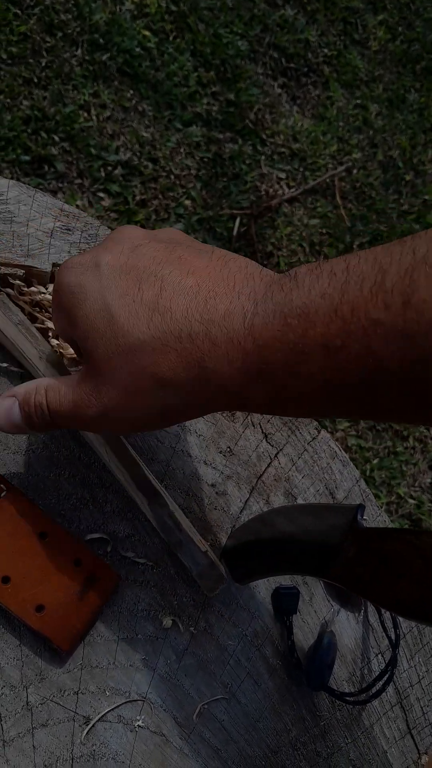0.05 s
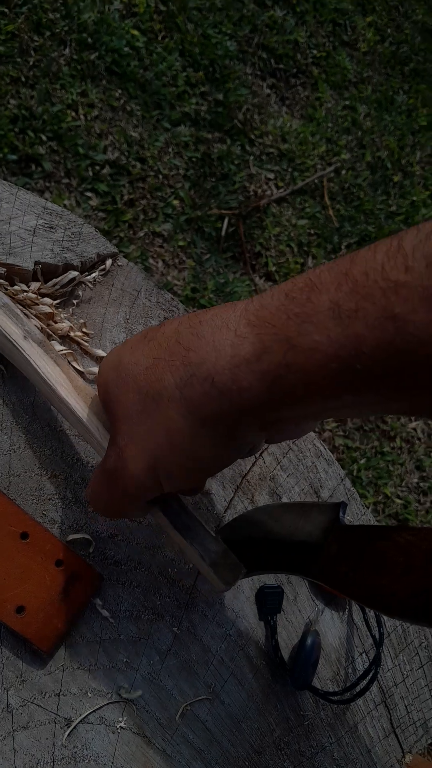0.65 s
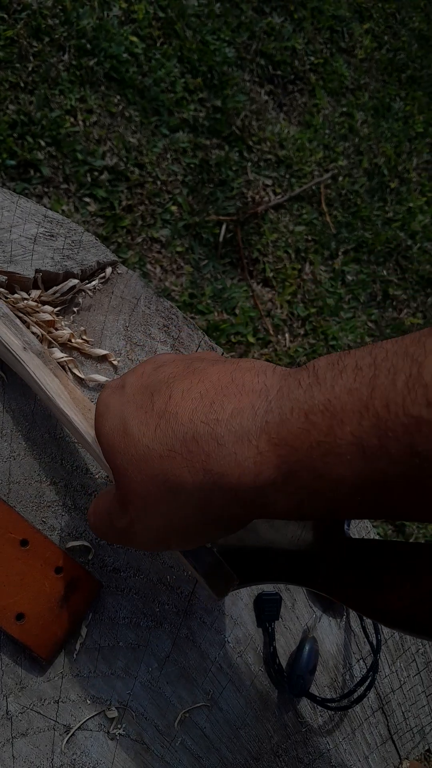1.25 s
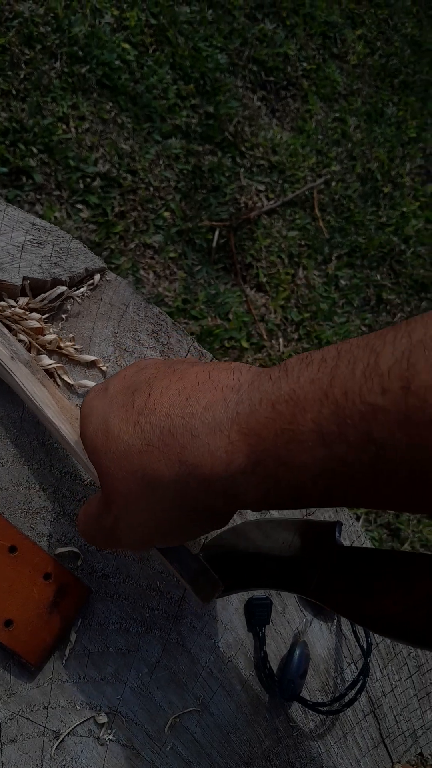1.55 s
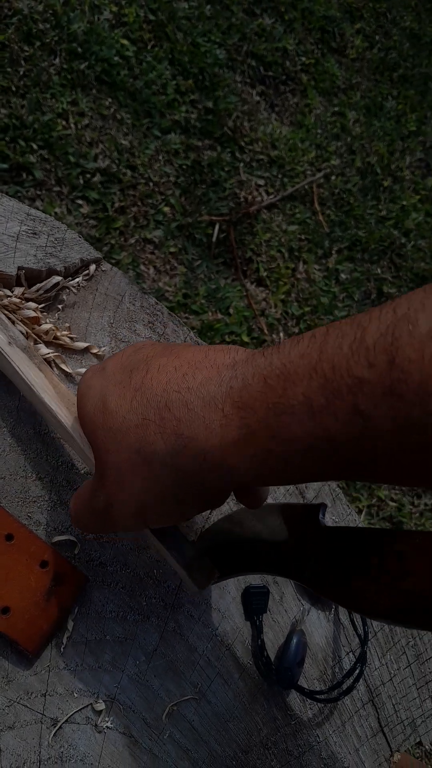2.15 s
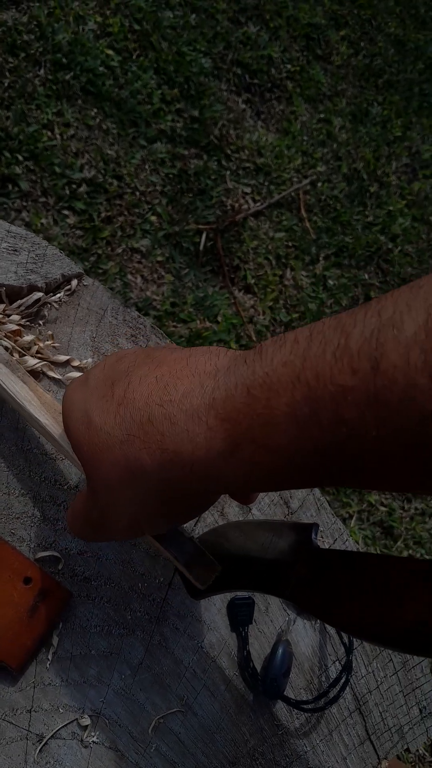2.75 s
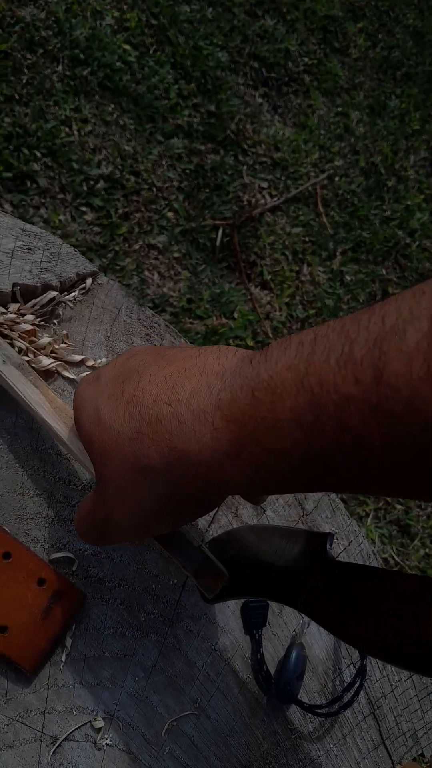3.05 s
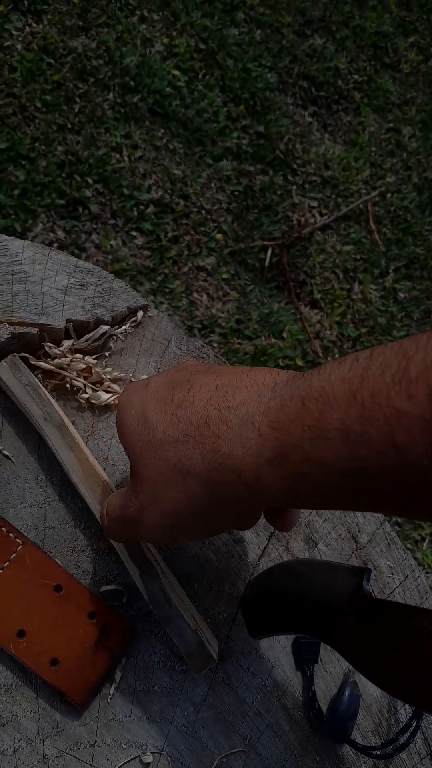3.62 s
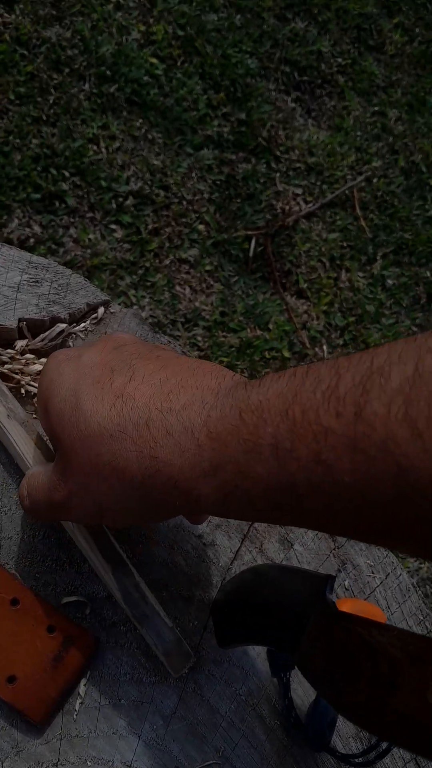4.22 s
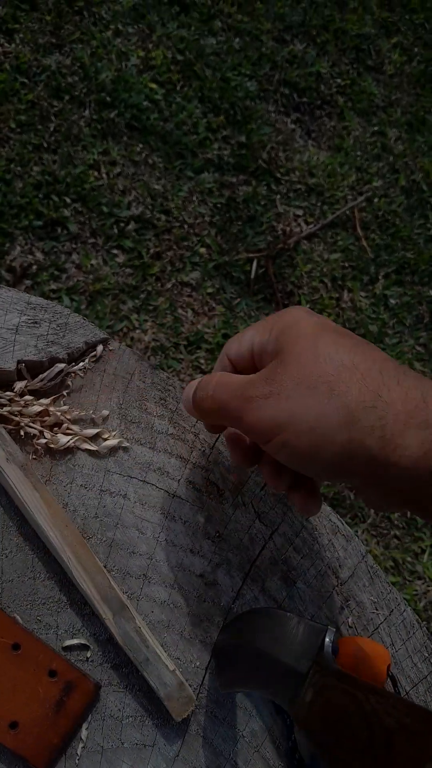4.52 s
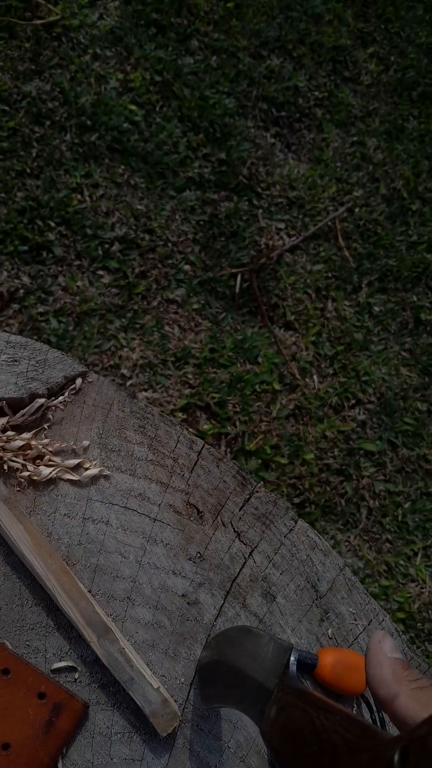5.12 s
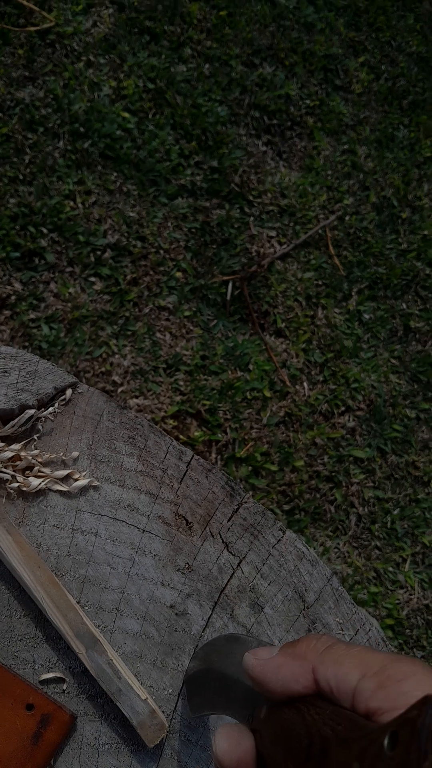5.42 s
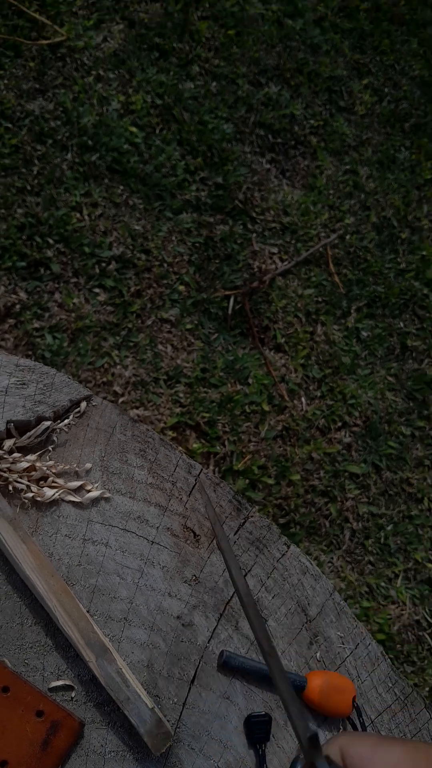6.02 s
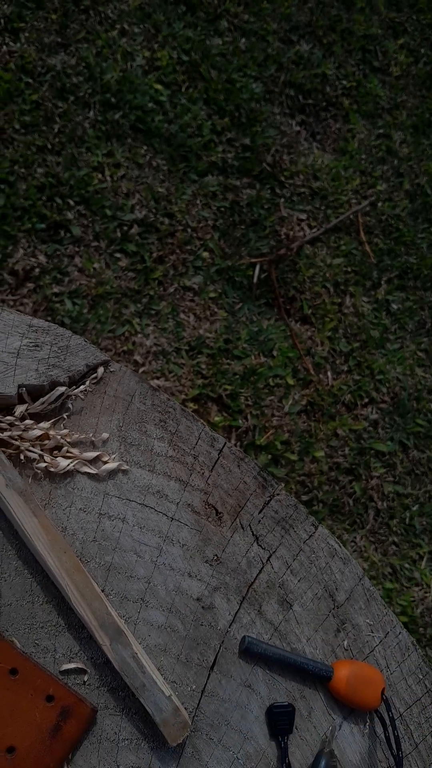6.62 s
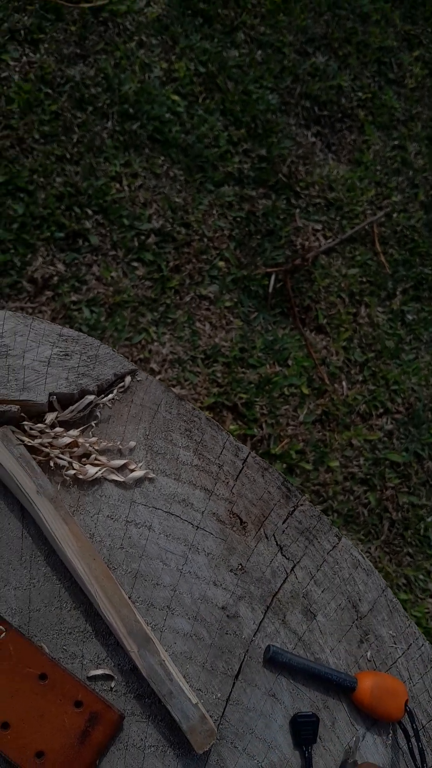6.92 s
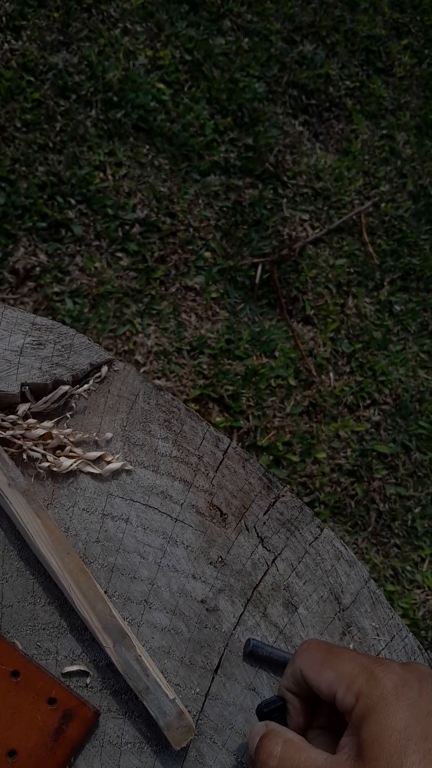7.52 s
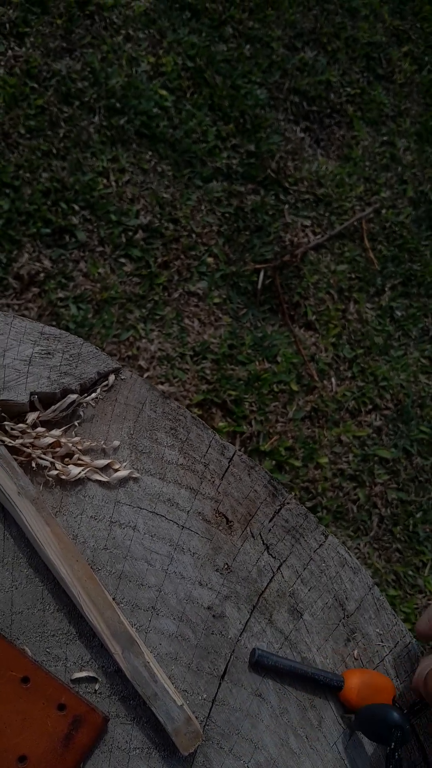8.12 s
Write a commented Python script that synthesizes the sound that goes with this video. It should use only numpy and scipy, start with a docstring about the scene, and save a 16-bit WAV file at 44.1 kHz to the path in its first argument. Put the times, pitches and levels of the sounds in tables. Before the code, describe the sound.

Wind buffets the microphone throughout with a low, uneven rumble, gusting in the first second, thumping near 1.8 seconds and gusting again around 3.5, then easing. Close by, a dry wooden stick is rubbed and shifted on a stump in soft, grainy, slightly squeaky scuffs from about 0.4 to 3.4 seconds. At 3.5 seconds it hits the stump with one sharp, briefly ringing knock, the loudest sound, followed by faint taps. From 4 seconds fingers brush lightly over tools. Near 5.8 seconds a knife is lifted with a small tick and a short, faint scrape. A fire steel is nudged with light ticks and dull wooden bumps between 6.4 and 6.8 seconds, and one more click comes at 8.3. Distant birds whistle and trill faintly and insects buzz over a soft garden hush.

```python
"""A dry wooden stick is rubbed and shifted by hand on a stump, then knocks down once and rings.
Next a knife is taken up and a fire steel is nudged: light brushing, small ticks and dull bumps.
Wind buffets the two microphone openings (ports), each on its own, making a low, lumpy rumble.
Far off, birds and insects call faintly over the hush of a garden."""
import sys
import numpy as np
from scipy import signal
from scipy.fft import rfft, irfft
from scipy.io import wavfile

SR = 44100
rng = np.random.default_rng(int(sys.argv[2]) if len(sys.argv) > 2 else 0)


def transcribe(u):
    """Save the signal u as a 16-bit wav file named by the first command-line argument.

    u: samples, shape (n,) or (channels, n), limited to [-1, 1]; the rate is SR.
    q: integer samples, one column per channel.
    """
    v = np.clip(np.atleast_2d(u).T, -1, 1)
    q = np.round(v * 32767).astype(np.int16)
    wavfile.write(sys.argv[1], SR, q)


N = 368676
TIME = np.arange(N) / SR


def from_db(db):
    """Turn decibels into a gain to multiply by."""
    return 10 ** (np.asarray(db) / 20)


def rms_one(x):
    """Scale a signal so that its average strength (rms) is 1."""
    return x / np.sqrt(np.mean(x ** 2) + 1e-20)


def in_time(rows):
    """Join a table's points with straight lines: one curve for each column after the time."""
    times, *columns = np.transpose(rows)
    return [np.interp(TIME, times, column) for column in columns]


def at_hz(colour, hz):
    """Read the level at hz from a colour: a table of how strong each frequency is."""
    freqs, db = np.transpose(colour)
    return np.interp(np.log(hz), np.log(freqs), db)


def filtered(x, hz, kind, order=2):
    """Keep the "low" part, the "high" part or one "band" of a sound."""
    sections = signal.butter(order, np.clip(hz, 10, .45 * SR), kind, fs=SR, output="sos")
    return signal.sosfilt(sections, x + 1e-18)


def pan(lean_db):
    """Left and right gains; the lean says how much louder the left side is."""
    return rms_one(from_db([[lean_db / 2], [-lean_db / 2]]))


def drift(per_s):
    """A random wobble of typical size 1 that heads for a new value per_s times a second."""
    knots = rng.standard_normal(4000)
    return rms_one(np.interp(TIME * per_s, np.arange(len(knots)), knots))


def noise(colour, alike=0.):
    """Stereo noise that fades steeply past its colour's ends; alike=1 makes both sides the same."""
    hz = np.maximum(np.arange(N // 2 + 1) * SR / N, 1)
    low_fade = np.minimum(hz / colour[0][0], 1) ** 2
    high_fade = np.minimum(colour[-1][0] / hz, 1) ** 4
    gain = from_db(at_hz(colour, hz)) * low_fade * high_fade
    mid, side = irfft(rfft(rng.standard_normal((2, N))) * gain, N)
    return rms_one(np.sqrt(1 + alike) * mid + np.sqrt(1 - alike) * side * [[1], [-1]])


def fade(t60, t):
    """A gain that drops by 60 dB in t60 seconds, the fade time."""
    return from_db(-60 * t / t60)


def ring(hz, t60, t):
    """One dying tone of a struck object."""
    return np.sin(2 * np.pi * hz * t) * fade(t60, t)


def swell(s, hold_s, rise_s, fall_s):
    """A gain that reaches 1 at time s, holds, then dies away; rise and fall each cover 20 dB."""
    return from_db(-20 * np.clip(np.maximum((s - TIME) / rise_s, (TIME - s - hold_s) / fall_s), 0, 10))


def noise_swells(rows, colour, rise_s, fall_s, grain_db, grains_per_s, alike=.2):
    """Swells of noise, roughened by a quick flicker in level."""
    power = sum((from_db(db) * swell(s, hold_s, rise_s, fall_s)) ** 2 for s, hold_s, db in rows)
    grain = from_db(grain_db * drift(grains_per_s))
    return np.sqrt(power) * grain * noise(colour, alike)


def add(out, s, sound):
    """Mix a short sound in at time s."""
    i = max(int(s * SR), 0)
    out[:, i:i + sound.shape[-1]] += sound[..., :N - i]


# How the hush rises and falls: t/s, level/dB (in all tables, levels are before any further gains)
HUSH_LEVELS = [(3.9, -72.5), (4.66, -72), (4.93, -67.5), (5.5, -75), (5.9, -70.5), (6.87, -68.5),
               (7.14, -72.5), (8.36, -67)]
# Colours of the low hush and the high hiss: f/Hz, level/dB
HUSH_COLOUR = [(300, 3), (750, -9), (1030, 1.5), (1250, -5.5), (1550, 3.5), (1950, -12.5), (2300, -2),
               (2700, -11), (3200, -9.5), (4500, -16), (8000, -19)]
HISS_COLOUR = [(2000, 6.5), (4500, -8), (7400, 0.5), (9000, -6.5), (12000, -4.5), (16000, -4.5)]


def garden(hush_gain_db=5.0, waver_db=.8, hiss_db=-73):
    """A distant hush wavers a little over an even hiss."""
    level_db, = in_time(HUSH_LEVELS)
    hush = from_db(level_db + hush_gain_db + waver_db * drift(12)) * noise(HUSH_COLOUR, alike=0.067)
    return hush + from_db(hiss_db) * noise(HISS_COLOUR)


# Swells of a midrange hush: t/s, hold/s, level/dB
MID_SWELLS = [(0.0, 3.73, -63.5), (0.35, 0.65, -63.5), (2.75, 0.89, -63.5), (4.04, 0.029, -64)]
# Their colour: f/Hz, level/dB
MID_COLOUR = [(450, -3.5), (800, -6.5), (1350, 1), (1700, 1), (2000, -4.5), (2800, -9.5), (3300, -11),
              (5000, -21), (9000, -23.5)]


def midrange_hush():
    """A soft, steady midrange hush through the first half, with one brief swell after it."""
    return noise_swells(MID_SWELLS, MID_COLOUR, rise_s=0.14, fall_s=0.11, grain_db=1.93, grains_per_s=60)


# A bird's quick run: start t/s, end t/s, notes per s, start f/Hz and end f/Hz of each note,
# first level/dB, last level/dB
TRILL = (0.40, 1.25, 14, 4450, 3750, -73, -77.5)


def trill_notes(note_s=.06, width_hz=320, vary_db=3.5):
    """List the run as short falling whistles, uneven and tending to grow weaker."""
    start_s, end_s, per_s, start_hz, end_hz, first_db, last_db = TRILL
    times = np.arange(start_s, end_s, 1 / per_s)
    levels = np.linspace(first_db, last_db, len(times)) + vary_db * rng.standard_normal(len(times))
    return [(s, note_s, start_hz, end_hz, db, width_hz) for s, db in zip(times, levels)]


# Falling bird whistles: t/s, length/s, start f/Hz, end f/Hz, level/dB, width of the blur/Hz
WHISTLES = [(0.0, .19, 4170, 3560, -74.5, 220), (0.16, 0.18, 6420, 5010, -73, 80),
            (0.27, 0.095, 5400, 3750, -72.5, 80), (0.755, 0.028, 5500, 3870, -71.5, 100),
            (3.218, .125, 5300, 3950, -65.5, 524), (6.142, .068, 6800, 5550, -79, 250),
            (7.9, 0.33, 4960, 4090, -81, 250), (7.935, .36, 4120, 3600, -77, 110.6)]
# Hoarse bird calls and insect buzzes, each on one pitch: t/s, length/s, f/Hz, level/dB
HOARSE_CALLS = [(2.657, .12, 4250, -72), (2.735, .28, 3090, -70.5), (3.038, .09, 3416, -67),
                (3.318, .45, 3250, -68.5)]
BUZZES = [(2.39, .35, 6630, -75.5), (4.674, .3, 6760, -84.5), (5.72, .15, 9900, -76),
          (6.937, 0.28, 7000, -79.5), (7.02, .19, 9900, -80), (8.006, .17, 9980, -76)]


def birds_and_insects(gain_db=9.5, hoarse_width_hz=280, buzz_width_hz=850, echo_db=-9, echo_t60=0.43):
    """Calls are blurred into narrow bands of noise by distance and by echoes from the trees."""
    hoarse = [(s, length, hz, hz, db, hoarse_width_hz) for s, length, hz, db in HOARSE_CALLS]
    buzzes = [(s, length, hz, hz, db, buzz_width_hz) for s, length, hz, db in BUZZES]
    calls = np.zeros((2, N))
    for s, length, start_hz, end_hz, db, width_hz in WHISTLES + trill_notes() + hoarse + buzzes:
        progress = np.linspace(0, 1, int(length * SR))
        white = rng.standard_normal((2, SR)) + 1j * rng.standard_normal((2, SR))
        blur = filtered(white, width_hz / 2, "low", order=1)
        blur = filtered(blur, 2 * width_hz, "low")[:, -len(progress):]
        tone = np.exp(2j * np.pi * np.cumsum(start_hz + (end_hz - start_hz) * progress) / SR)
        arch = np.sqrt(4 * progress * (1 - progress))
        add(calls, s, from_db(db + gain_db) * arch * rms_one((blur * tone).real))
    t = TIME[:SR // 2]
    trees = rms_one(rng.standard_normal((2, len(t))) * fade(echo_t60, t)) / np.sqrt(len(t))
    return calls + from_db(echo_db) * signal.fftconvolve(calls, trees, axes=1)[:, :N]


# The breeze between gusts: t/s, level/dB, lean/dB
BREEZE = [(0, -41.5, 3.5), (1.6, -43.5, -1), (2.25, -39.5, -2.5), (2.5, -39.5, -0.5), (3.8, -40, 6),
          (5.05, -45, 21), (5.3, -55, -2), (5.45, -60, 4.5), (5.58, -49, 14), (5.9, -48, 4),
          (7.05, -47.5, 11.5), (7.5, -56.5, -5), (8.36, -40.5, 4.5)]
# Gusts reaching the ports: t/s, hold/s, level/dB, lean/dB
GUSTS = [(0.269, 0.078, -26, -6.5), (0.417, 0.1, -22.5, -8), (0.568, .19, -22.5, -1.5),
         (0.813, .11, -31, -2), (0.989, 0.055, -32.5, 8), (1.152, 0.07, -29, 3.5), (1.299, 0.14, -37.5, -7),
         (1.526, .07, -42, 14), (1.90, 0.15, -33, -0.5), (2.72, 0.19, -35, -7.5), (3.064, 0.052, -33.5, 3),
         (3.232, 0.25, -29, -7.5), (3.445, .05, -18.5, -3), (3.56, .12, -22.5, -10), (3.97, 0.12, -28.5, 9),
         (4.25, 0.18, -33, -1), (4.50, 0.4, -40.5, 6), (5.74, .12, -37, -0.5), (6.00, 0.28, -43.5, 0),
         (6.63, .15, -42.5, 7), (7.672, 0.082, -43.5, 2), (8.11, .18, -35, 3.5)]


def airflow_db(waver_db=3.0, wavers_per_s=9):
    """How strongly the air blows at each port: gusts ride on a wavering breeze."""
    level_db, lean_db = in_time(BREEZE)
    share = from_db(np.array([lean_db, -lean_db]) / 2) ** 2
    waver = waver_db * np.array([drift(wavers_per_s), drift(wavers_per_s)])
    power = from_db(level_db + waver) ** 2 * share / share.mean(axis=0)
    for s, hold_s, db, side_db in GUSTS:
        power += (from_db(db) * pan(side_db) * swell(s, hold_s, rise_s=.07, fall_s=.08)) ** 2
    return 10 * np.log10(power)


# Colour of the wind's rumble: f/Hz, level/dB
WIND_COLOUR = [(24, -20.5), (40, -5), (55, 6.5), (68, 5.5), (85, 3), (120, -5), (170, -9.5), (250, -16),
               (350, -24.5), (500, -38.5), (700, -54), (1100, -68.5)]
# How fine the swirls are (finer sounds brighter): t/s, tilt/dB per octave
WIND_FINENESS = [(0, -6), (1.0, -5), (3.2, -4), (3.6, -0.5), (4.05, 1.5), (4.7, 2.5), (5.3, 2.5), (7.7, 0),
                 (8.1, 1.5)]


def wind(flow_brightens=0.4, lump_brightens=.12, usual_db=-32, lumpy_db=4.6, lumps_per_s=36, port_hz=40):
    """Air hits each port in lumps; a lump breaks into smaller swirls, so its peak sounds brighter."""
    edges_hz = 20 * 2 ** (np.arange(12) / 2)
    centres_hz = np.sqrt(edges_hz[1:] * edges_hz[:-1])
    window = np.hanning(SR // 5) / np.hanning(SR // 5).sum()
    fine_db, = in_time(WIND_FINENESS)
    ports = []
    for flow_db in airflow_db():
        lump_db = lumpy_db * drift(lumps_per_s)
        white = rng.standard_normal((2, N))
        tilt_db = fine_db + flow_brightens * (flow_db - usual_db) + lump_brightens * lump_db
        air = 0
        for k, hz in enumerate(centres_hz):
            octaves = np.clip(np.log2(hz / 80), 0, 2.5)
            band = rms_one(filtered(white[k % 2], edges_hz[k:k + 2], "band", order=3))
            air += np.sqrt(hz) * from_db(at_hz(WIND_COLOUR, hz) + lump_db + octaves * tilt_db) * band
        air = filtered(air, port_hz, "high")
        # lumps share out the energy of the flow without changing its average
        running_rms = np.sqrt(signal.fftconvolve(air ** 2, window, "same"))
        ports.append(from_db(flow_db) * air / running_rms)
    return np.array(ports)


# Single swirls of air that thump a port: t/s, level/dB, final f/Hz, lean/dB
EDDIES = [(0.672, -16.5, 110.6, -22), (0.778, -18, 91, 18), (1.127, -27.5, 80.7, -14),
          (1.514, -34, 70.6, 19), (1.826, -11.5, 74.5, 29), (2.165, -31.5, 133, -16),
          (3.389, -14.5, 103.5, -25), (3.613, -16.5, 117.5, -20), (3.995, -21.5, 105.6, 4),
          (4.037, -35, 152, 12), (4.359, -19, 69, 7), (5.108, -29, 69.7, -1), (5.77, -36, 87.6, -14),
          (6.136, -32, 79, -7), (6.432, -39.5, 88, 3), (6.917, -40, 65, 12), (7.331, -40.5, 69.3, 8.5)]


def eddies(swell_s=0.011, extra_speed=3.1, settle_s=0.0032, top_hz=480):
    """A swirl hits with a quick edge, then swings a few times more slowly."""
    out, t = np.zeros((2, N)), TIME[:SR // 6]
    thump = t / swell_s * np.exp(1 - t / swell_s)
    for s, db, hz, lean_db in EDDIES:
        cycles = hz * (t + extra_speed * settle_s * (1 - np.exp(-t / settle_s)))
        add(out, s, -from_db(db) * pan(lean_db) * thump * np.sin(2 * np.pi * cycles))
    return filtered(out, top_hz, "low", order=3)


# Fingers touching the knife and the fire steel: t/s, hold/s, level/dB
BRUSHES = [(4.05, .07, -76), (4.75, .3, -83), (5.47, 0.06, -73.5), (5.60, .22, -75.5), (6.03, .04, -74.5),
           (6.43, .32, -76.5), (7.73, 0.038, -73), (8.05, 0.37, -78.5)]
# Their colour: f/Hz, level/dB
BRUSH_COLOUR = [(2500, -7), (5000, -10.5), (7500, -7.5), (10500, -6.5), (12500, -6), (15500, -6)]


def finger_brushes(gain_db=6.5):
    """Skin slides lightly over the tools with a thin hiss."""
    hiss = noise_swells(BRUSHES, BRUSH_COLOUR, rise_s=0.087, fall_s=0.15,
                        grain_db=2, grains_per_s=200, alike=0)
    return from_db(gain_db) * pan(-5.5) * hiss


# The knife leaving the stump: t/s, hold/s, level/dB
DRAG = [(5.78, 0.11, -61.5)]
# Its colour: f/Hz, level/dB
DRAG_COLOUR = [(400, 1.5), (850, -17), (1350, -5), (1520, 6), (1750, -5), (3000, -12), (7000, -16),
               (10000, -18)]


def knife_drag():
    """The knife slides off the wood with a short, rough scrape."""
    return noise_swells(DRAG, DRAG_COLOUR, rise_s=0.033, fall_s=0.041, grain_db=4.5, grains_per_s=87)


# Light ticks of the tools: t/s, level/dB, f/Hz, fade time/s
TICKS = [(4.059, -58, 7360, .02), (5.763, -43.5, 7390, 0.035), (6.410, -42, 2134, 0.031),
         (6.464, -55, 10640, 0.0097), (6.744, -56, 3530, 0.034), (8.319, -37, 5660, 0.013)]


def tool_ticks(snap_db=-7, snap_t60=0.049, tone_db=-4):
    """Each small, hard contact gives a bright snap and one short tone."""
    out, t = np.zeros((2, N)), TIME[:SR // 8]
    for s, db, hz, t60 in TICKS:
        bright = filtered(rng.standard_normal((2, len(t))), 1540, "high", order=1)
        snap = from_db(snap_db) * fade(snap_t60, t) * bright
        tone = from_db(tone_db) * ring(hz, t60, t)
        add(out, s, from_db(db) * pan(-3.21) * (snap + tone))
    return out


# The stick and the tools bumping the stump: t/s, level/dB
BUMPS = [(3.466, -40), (3.618, -47), (4.058, -57), (6.410, -51.5), (6.727, -51), (6.742, -37),
         (6.756, -39.5), (6.794, -51)]
# The stump's own tones: f/Hz, level/dB, fade time/s
STUMP_TONES = [(387, 1, 0.09), (528, 4, 0.05), (585, -3, 0.072), (968, 3.5, 0.056), (1090, -4, 0.043),
               (1400, -10.5, .04), (2137, -7.5, 0.07), (2790, -25, .025), (3670, -22.5, 0.065)]


def stump_bumps(vary_db=1.5, scuff_db=-6, scuff_t60=0.044):
    """Each dull blow rings the stump a little differently and adds a small scuff."""
    out, t = np.zeros((2, N)), TIME[:SR // 4]
    for s, db in BUMPS:
        body = sum(from_db(tone_db + vary_db * rng.normal()) * rng.choice([-1, 1]) * ring(hz, t60, t)
                   for hz, tone_db, t60 in STUMP_TONES)
        dull = filtered(rng.standard_normal((2, len(t))), [350, 2500], "band", order=1)
        scuff = from_db(scuff_db) * fade(scuff_t60, t) * dull
        add(out, s, from_db(db) * pan(-5.1) * (body / 2 + scuff))
    return out


# Strokes of hand and stick on the stump: t/s, hold/s, level/dB, extra for body/dB, extra for squeak/dB
RUBS = [(0.37, 0.2, -68.5, -5, 1), (0.6, 0.1, -54.5, -12, -14), (0.909, 0.019, -58, -6, -3),
        (0.993, .08, -69, 3.5, -6), (1.169, 0.0052, -58.5, -1, 7), (1.866, 0.038, -65, 12, -8),
        (2.152, 0.026, -53.5, 3.5, -1), (2.211, 0.041, -52, 2.5, -3), (2.306, 0.065, -59.5, 4.5, -8),
        (2.514, 0.022, -53, 2.5, -1), (3.124, 0.029, -55, 2, -2), (3.226, 0.1, -71, 3.5, -4),
        (3.392, .025, -57, 0, -6), (3.51, 0.061, -67.5, 9, -4.5)]
# Colours of the rubbing hiss and of the stick's ringing body: f/Hz, level/dB
RUB_HISS_COLOUR = [(3000, -18), (3700, -7), (4300, -6), (5100, -15), (5700, -5), (6400, -8), (7200, -6),
                   (8800, -1.5), (10800, -7.5), (12200, -4.5), (14000, -2.5), (16000, -1.5)]
RUB_BODY_COLOUR = [(450, -12.5), (1000, -5.5), (1900, -7), (2400, 0.5), (2750, 3), (3200, -12.5),
                   (4500, -31.5)]


def stick_rubs(hiss_gain_db=0.5, grain_db=1.5, grains_per_s=300,
               squeak_width_hz=260, catch_db=4.5, wander=.012, wanders_per_s=14):
    """Wood fibres catch and slip: a grainy hiss, the held stick's broad ring and wandering squeaks."""
    hiss_gain, body_gain, squeak_gain = np.zeros((3, N))
    for s, hold_s, level_db, body_db, squeak_db in RUBS:
        stroke = from_db(level_db) * swell(s, hold_s, rise_s=0.033, fall_s=.08)
        hiss_gain += stroke * from_db(hiss_gain_db)
        body_gain += stroke * from_db(body_db)
        squeak_gain += stroke * from_db(squeak_db)
    squeaks = 0
    for hz in (2760, 5700, 8760, 14000):
        cycles = np.cumsum(hz * (1 + wander * drift(wanders_per_s))) / SR
        blur = filtered(rng.standard_normal((2, N)), squeak_width_hz / 2, "low", order=1)
        catching = from_db(catch_db * drift(11))   # each squeak comes and goes
        squeaks += catching * blur * np.sin(2 * np.pi * cycles)
    grain = from_db(grain_db * drift(grains_per_s))
    hiss = hiss_gain * noise(RUB_HISS_COLOUR)
    body = body_gain * noise(RUB_BODY_COLOUR, alike=0.32)
    return grain * pan(-1.8) * (hiss + body + squeak_gain * rms_one(squeaks))


# The stick hits the stump, one loud knock and three faint taps: t/s, level/dB, contact softness/ms
KNOCKS = [(3.4653, 2.5, 0.9), (3.504, -32, .5), (3.590, -37, 0.8), (3.600, -32.5, 0.99)]
# The stick's own tones: f/Hz, level/dB, fade time/s, lean/dB
STICK_TONES = [(882, -22.5, 0.012, -7.5), (1317, -16, 0.014, -9), (1950, -10, .125, -1),
               (2434, -10, .083, -1), (2670, -15, 0.022, -3.5), (2870, -10.5, 0.016, -3.5),
               (3413, -21, 0.014, -4.5), (4038, -14.5, 0.012, -3), (5410, -22.5, 0.033, -4),
               (6484, -24, 0.014, -1.5), (7983, -21, .015, 2.5), (8500, -25.5, 0.011, -1.5),
               (14060, -23.5, .01, -9.5)]


def stick_knocks(crack_db=-19, crack_t60=0.014, tail_db=-47, tail_t60=.22, lag_s=.000045):
    """Each blow rings the stick; a short crack leads and the ground scatters a faint tail."""
    out, t = np.zeros((2, N)), TIME[:SR // 2]
    port_t = np.maximum(t - [[lag_s], [0]], 0)   # the left port is a little farther away
    tones = sum((-1) ** k * from_db(db) * pan(lean_db) * ring(hz, t60, port_t)
                for k, (hz, db, t60, lean_db) in enumerate(STICK_TONES))
    for s, db, soft_ms in KNOCKS:
        bright = filtered(rng.standard_normal(tones.shape), 900, "high")
        crack = from_db(crack_db) * fade(crack_t60, t) * bright
        scatter = filtered(rng.standard_normal(tones.shape), [1200, 3500], "band", order=1)
        tail = from_db(tail_db) * fade(tail_t60, t) * scatter
        contact = 1 - np.exp(-t * 1000 / soft_ms)
        add(out, s, from_db(db) * contact * (tones + crack + tail))
    return out


def scene():
    """Stick and tools close by, wind on the ports, the garden beyond."""
    stick = stick_rubs() + stick_knocks()
    hush = midrange_hush()
    tools = finger_brushes() + tool_ticks() + stump_bumps() + knife_drag()
    return stick + tools + wind() + eddies() + birds_and_insects() + hush + garden()


def record(dry):
    """Cut away the very highest treble steeply."""
    cutoff_hz = 15900
    return signal.sosfilt(signal.ellip(10, .1, 80, cutoff_hz, fs=SR, output="sos"), dry)


dry = scene()
out = record(dry)
transcribe(out)
```